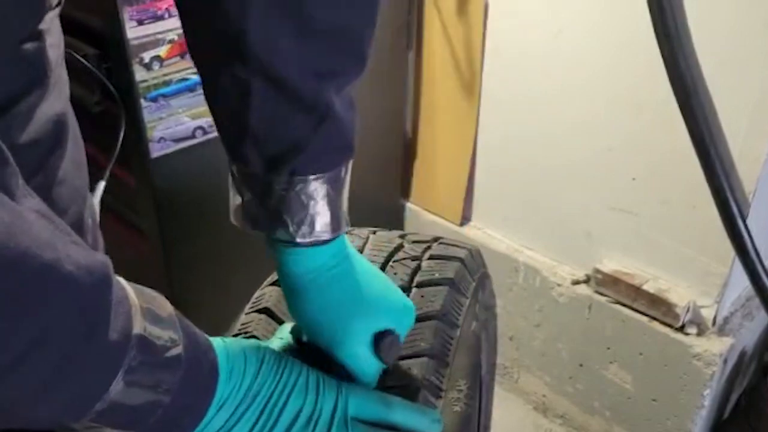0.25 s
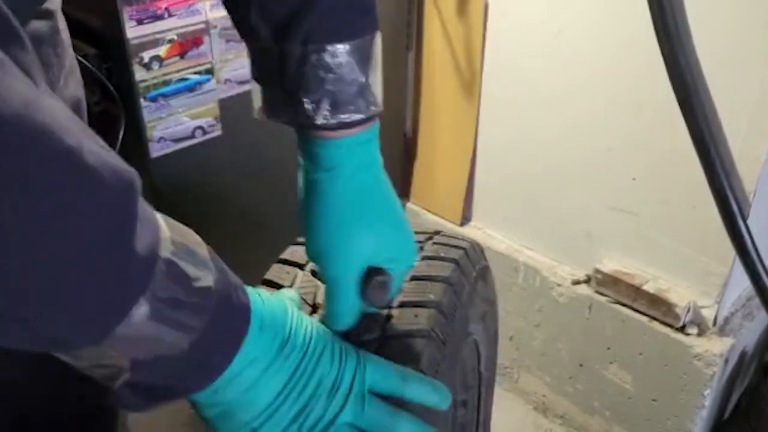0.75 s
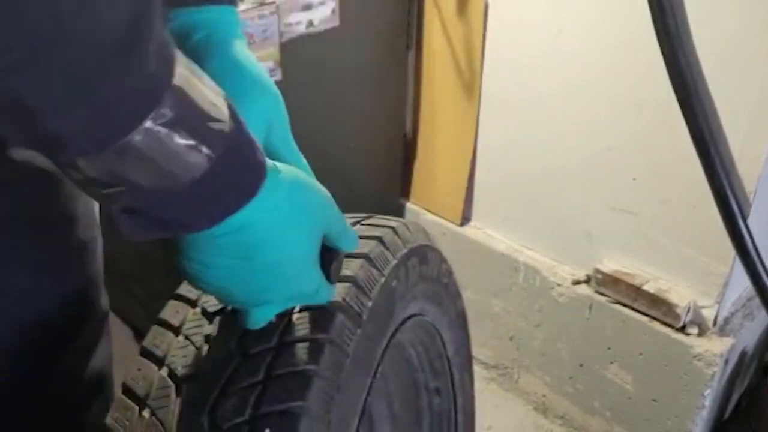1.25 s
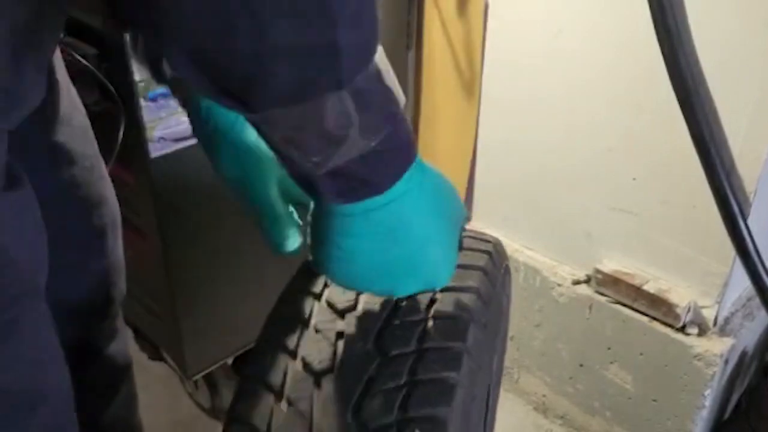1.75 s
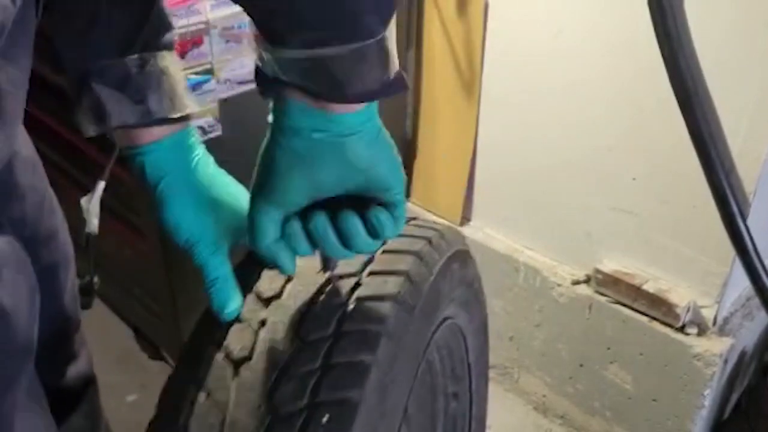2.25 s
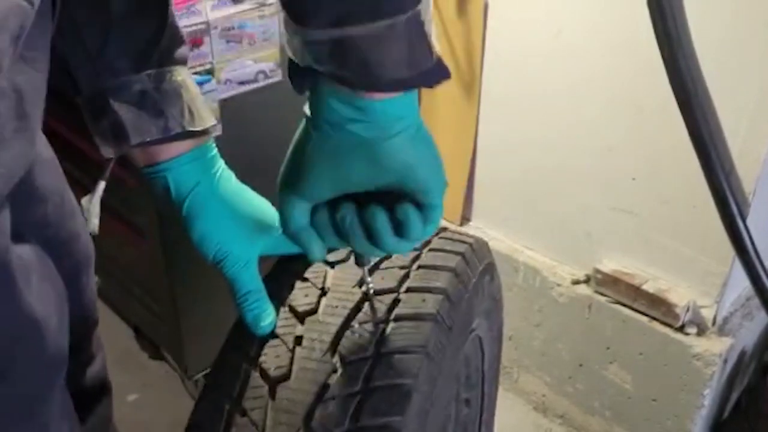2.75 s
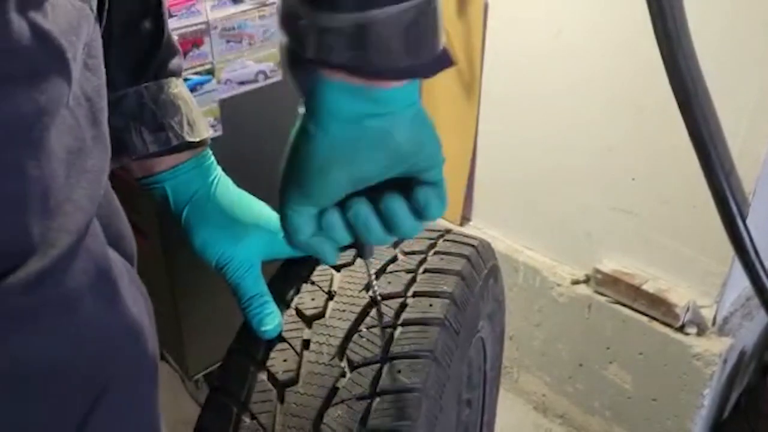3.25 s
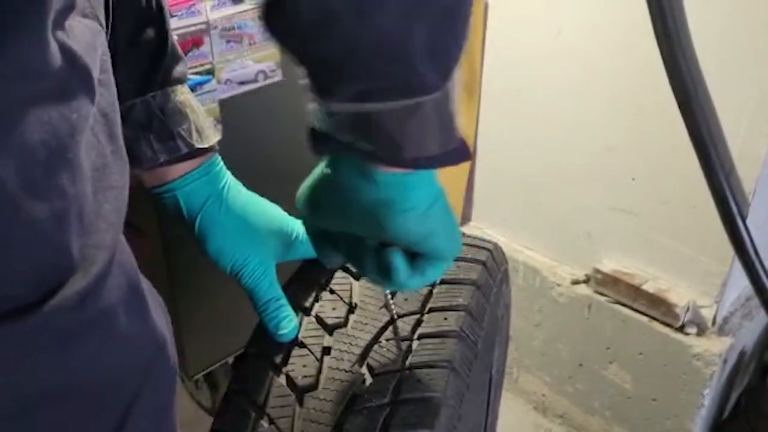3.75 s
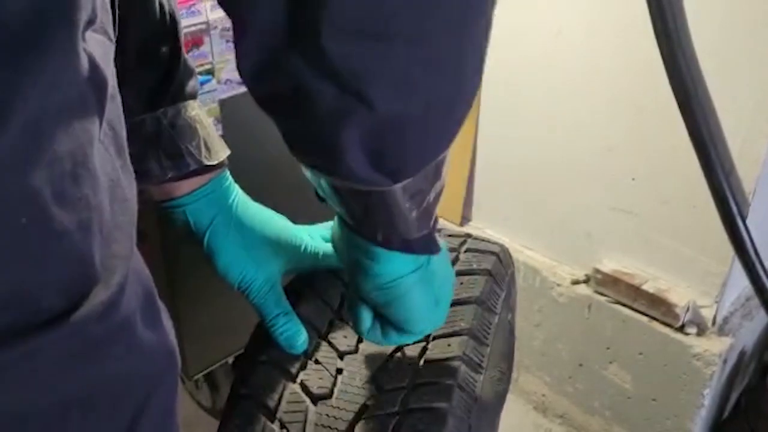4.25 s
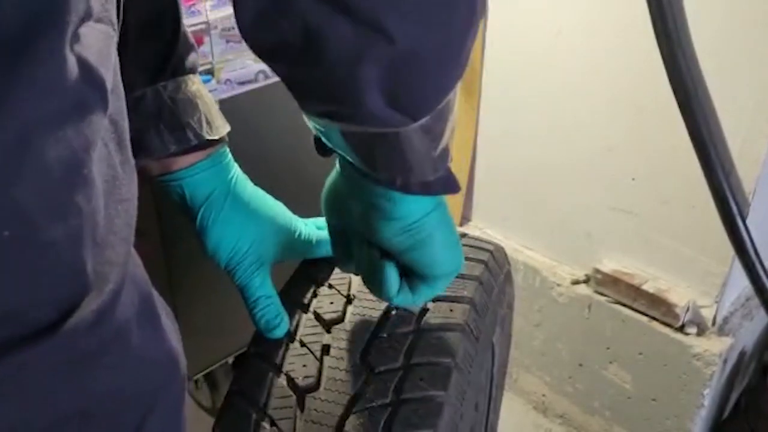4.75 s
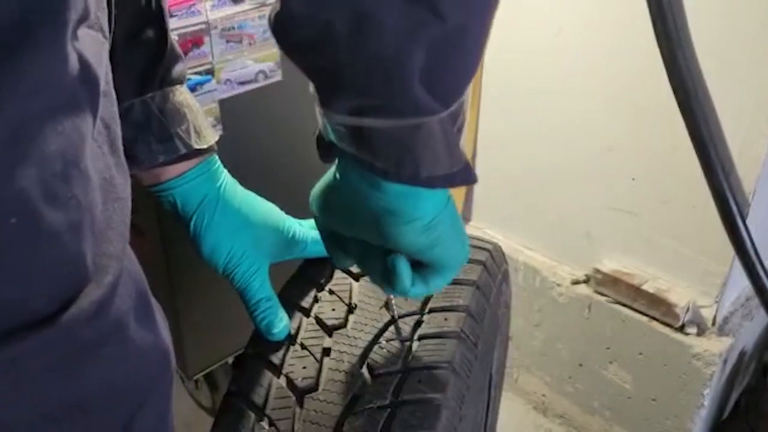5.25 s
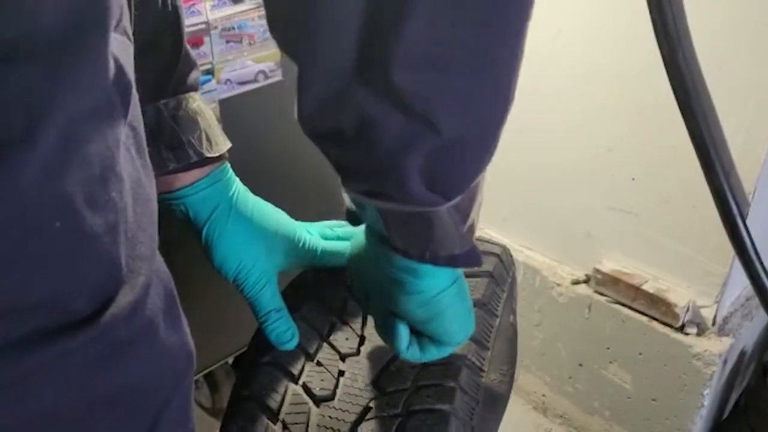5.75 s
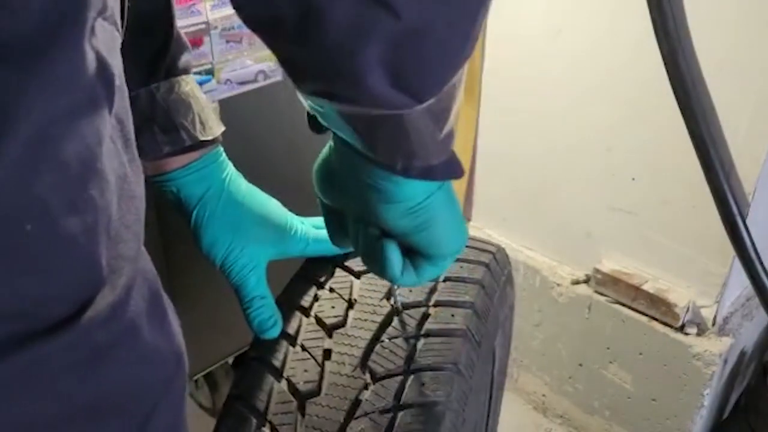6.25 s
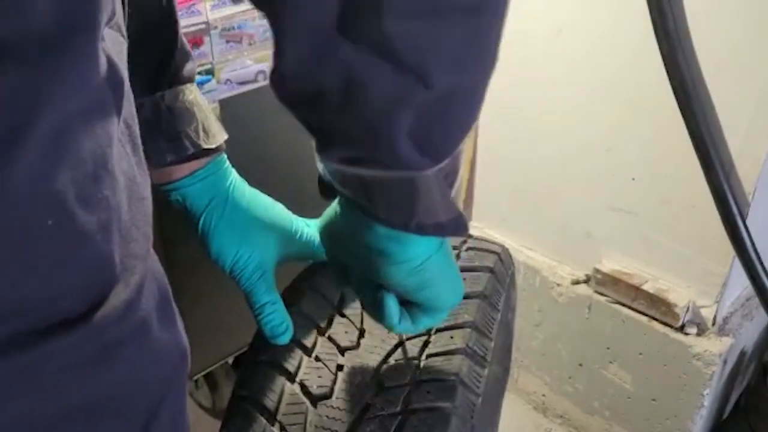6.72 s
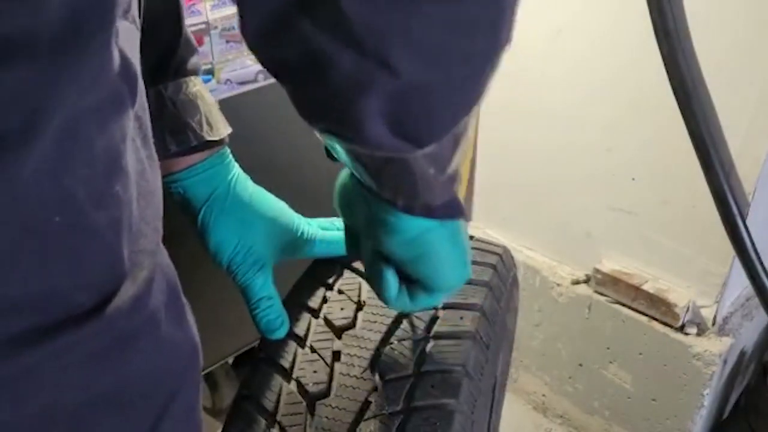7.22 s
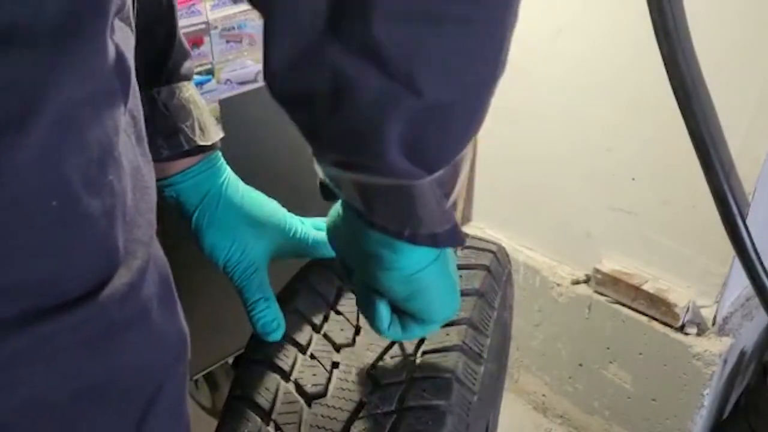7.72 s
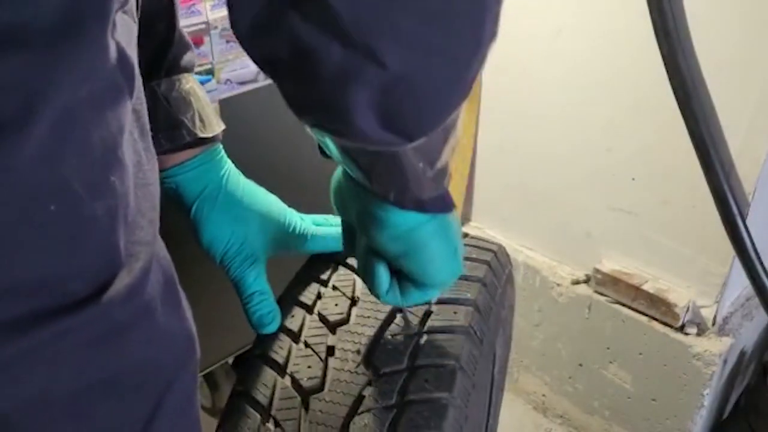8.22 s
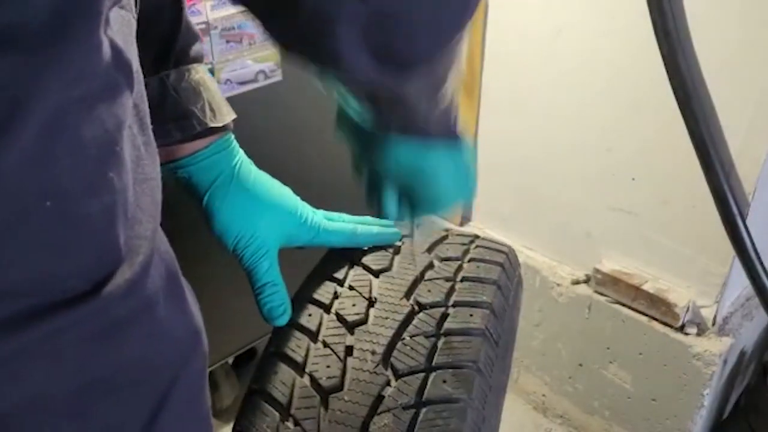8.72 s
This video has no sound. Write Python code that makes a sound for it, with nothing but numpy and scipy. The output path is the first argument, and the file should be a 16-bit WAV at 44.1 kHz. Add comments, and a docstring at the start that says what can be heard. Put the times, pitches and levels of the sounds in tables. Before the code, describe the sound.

A ridged steel tool is sawn through a punctured tire, heard very close. Sparse handling knocks and rubbing come first, then tentative scratches, then alternating strokes: clustered snaps with a hollow rubber boom, answered by brighter ratcheting rasps. Rubber squeezes and crackles underneath; short hisses of air escape near the end, over faint low room hum.

```python
"""A steel rasp is worked up and down in a punctured tire on a garage floor, close to two microphone ports.
Each ridge slips past the steel belt with a gritty snap (noise bursts through resonances) and jolts
the hollow carcass, which rings low (decaying sines). Coloured noise makes a bright hiss (cloth rustle early
on, later air past the shaft), the rub of gloves and shaft with its crackle, and the room tone; narrow
resonances of noise make the rocking carcass and a low hum. Scattered echoes make the garage."""
import sys
import numpy as np
from scipy import signal
from scipy.fft import rfft, irfft, next_fast_len
from scipy.io import wavfile
from scipy.ndimage import uniform_filter1d

SR = 44100
rng = np.random.default_rng(int(sys.argv[2]) if len(sys.argv) > 2 else 0)


def convert_level_to_amplitude(level_db):
    """Map a level in decibels to its linear amplitude factor."""
    exponent = np.asarray(level_db, float) / 20
    return 10 ** exponent


def waveform_to_disk(signal):
    """Save audio, clipped to [-1, 1], as 16-bit WAV at the path in sys.argv[1]."""
    frames = np.transpose(np.atleast_2d(signal))
    scaled = np.clip(frames, -1, 1) * 32767
    samples = np.round(scaled).astype(np.int16)
    wavfile.write(sys.argv[1], SR, samples)


N = 396018  # length in samples
SIZE = next_fast_len(N)
HZ = np.fft.rfftfreq(SIZE, 1 / SR)

# ridges slipping past the belt: start_s, snap_db, fizz_db (treble), jolt_db (before a common trim)
SLIP_EVENTS = [(0.0908, -31, -37, -26), (0.0986, -25.5, -31.5, -15.5), (0.1542, -36, -58, -21.5),
               (0.2393, -30, -61, -18), (0.6849, -46, -54, -41), (0.746, -54, -66, -56),
               (0.913, -45, -66, -51), (0.9516, -53, -46, -61), (1.7039, -61.5, -70, -15.5),
               (1.7777, -33, -38, -24), (2.448, -40, -37, -41), (2.463, -35.5, -29, -36),
               (2.4872, -33.5, -25, -40), (2.5031, -29.5, -30, -42), (2.511, -30.5, -25, -27),
               (2.559, -28, -19, -19.5), (2.8972, -43, -33, -79), (2.908, -55, -48, -56),
               (2.9253, -20, -21, -20.5), (2.9555, -40, -32, -35), (2.9658, -25.5, -20.5, -20),
               (3.027, -32, -19, -36), (3.42, -36, -36, -81), (3.436, -33, -24.5, -52),
               (3.696, -51, -42, -59), (3.815, -38.5, -32.5, -52), (3.8541, -44, -47, -55),
               (3.9122, -34, -40, -45), (3.9406, -43.5, -63, -42), (4.008, -43, -64.5, -29),
               (4.068, -26.5, -28.5, -30.5), (4.1648, -32.5, -35.5, -19), (4.1997, -40.5, -39, -24),
               (4.2481, -41, -48, -23), (4.2719, -43, -48, -20.5), (4.305, -48, -38.5, -47),
               (4.3828, -27, -31, -12.5), (4.4078, -26, -32, -11), (4.437, -22.5, -38, -12),
               (4.4467, -21.5, -22.5, 1.5), (4.6218, -29.5, -27, -32), (4.7645, -26.5, -28, -17),
               (4.8165, -40, -26.5, -45), (4.8293, -41, -35, -24), (4.8379, -22.5, -23, -34),
               (4.8706, -21, -20, -20), (4.9052, -18.5, -17, -22), (4.9435, -22.5, -17, -15.5),
               (5.0091, -20.5, -17.5, -46), (5.2013, -33, -30, -54), (5.3842, -39.5, -38, -59),
               (5.6709, -26, -28.5, -21), (5.684, -41, -42, -40), (5.6996, -22.5, -30, -8.5),
               (5.7191, -22, -24.5, -23), (5.7383, -24.5, -38, -15), (5.7504, -27, -27, -16.5),
               (5.8064, -25, -43, -12), (5.8163, -28.5, -33, -14), (5.8235, -37, -40, -9),
               (5.832, -18.5, -24.5, 1.5), (6.0392, -44, -39, -32), (6.0587, -37, -35, -50),
               (6.0749, -30.5, -29, -21), (6.087, -20, -33, -24), (6.123, -23.5, -17, -26),
               (6.1443, -25.5, -32, -21), (6.1533, -26, -20, -21), (6.179, -22, -21, -36),
               (6.208, -22, -21.5, -15), (6.2349, -25.5, -22, -17), (6.3036, -40, -34.5, -48),
               (6.3903, -31, -31.5, -35), (6.585, -51.5, -65, -51), (6.74, -28, -32, -19),
               (6.77, -39, -28.5, -30), (6.811, -31.5, -32.5, -13.5), (6.8322, -31, -35, -16),
               (6.85, -27, -33, -11), (6.8783, -24, -34, -11), (6.9088, -21, -25.5, -0.5),
               (7.1486, -37, -34, -28), (7.182, -22, -31, -18), (7.2066, -25.5, -30, -21.5),
               (7.22, -20, -16, -15), (7.2442, -21, -23, -16), (7.271, -21.5, -18, -25),
               (7.295, -21, -20, -18.5), (7.3249, -23, -21.5, -18), (7.3418, -29.5, -24.5, -36),
               (7.3664, -32, -22, -21), (7.3801, -25, -24, -29), (7.763, -28.5, -26, -12.5),
               (7.7827, -28, -37, -8), (7.7987, -27, -33, -23), (7.8193, -26.5, -29, -11),
               (7.8471, -25, -31, -18), (7.8654, -23, -27, 1.5), (8.1303, -37.5, -36, -32),
               (8.1443, -32, -28, -21), (8.161, -25.5, -31.5, -20), (8.1989, -31, -24, -18),
               (8.211, -21.5, -21, -17.5), (8.2561, -21.5, -22.5, -28), (8.291, -22.5, -18.5, -20.5),
               (8.3234, -23, -19.5, -20), (8.3458, -30, -25.5, -25), (8.3628, -23.5, -22, -23),
               (8.4066, -32.5, -26.5, -43), (8.4994, -43, -33.5, -45), (8.533, -27, -21.5, -21.5),
               (8.642, -43, -31.5, -33), (8.6586, -35.5, -33, -28.5), (8.674, -24, -20, -18.5),
               (8.7134, -18.5, -19.5, -39), (8.734, -17.5, -16, -20)]
# low ringing of the hollow tire: pitch_hz, level_db (relative), t60_s
CARCASS_MODES = [(64.7, 4, 0.13), (80, -12.5, 0.19), (97.8, -7.5, 0.21), (113, -22, 0.022),
                 (193.1, -8, 0.15), (260, -9.5, 0.1), (327, -15.5, 0.031)]
# resonances of the tread block: pitch_hz, width_hz, level_db (relative)
TREAD_MODES = [(349, 66, 8), (582, 59, 7), (707, 75, 6), (902, 114, 3.5), (1077, 91, 4.5), (1364, 390, -5)]
# resonances of the steel belt: pitch_hz, width_hz, level_db (relative)
BELT_MODES = [(2310, 1400, 1), (3820, 570, 8), (4110, 2630, -0.5)]
# treble resonances of the wire grit: pitch_hz, width_hz, level_db (relative)
FIZZ_MODES = [(7500, 350, 4), (9000, 4500, -0.5), (13600, 2400, 3.5)]


def evened(x):
    """Scales to rms 1."""
    return x / np.sqrt(np.mean(x ** 2) + 1e-20)


def read(points, hz):
    """Reads a table on a log-frequency axis."""
    f, value = np.transpose(points)
    return np.interp(np.log(hz + 1), np.log(f + 1), value)


def add(mix, start_s, sound):
    """Mixes a sound in at a time, cut off at the end of the mix."""
    part = mix[round(start_s * SR):][:len(sound)]
    part += sound[:len(part)]


def resonances(x, modes):
    """Parallel two-pole resonances of alternating sign."""
    total = 0
    for k, (hz, width_hz, db) in enumerate(modes):
        b, a = signal.iirpeak(hz, hz / width_hz, SR)
        total = total + (-1) ** k * convert_level_to_amplitude(db) * signal.lfilter(b, a, x)
    return total


def noise(spectrum, patchy_db):
    """Coloured noise of rms 1 whose level drifts in patches of time and frequency."""
    hz = np.fft.rfftfreq(1024, 1 / SR)
    real, imaginary, patches = rng.standard_normal((N // 256 + 5, 513, 3)).T
    patches = uniform_filter1d(patches, size=14, axis=0)
    patches = evened(uniform_filter1d(patches, size=8, axis=1))
    level_db = read(spectrum, hz)[:, None] + patchy_db * patches
    z = (real + 1j * imaginary) * convert_level_to_amplitude(level_db)
    return evened(signal.istft(z, nperseg=1024, noverlap=768)[1][:N])


def hum():
    """A low hum whose pitch and level waver: noise through one narrow resonance, twice."""
    mode = [(64.8, 7, 0)]  # pitch_hz, width_hz, level_db
    once = resonances(rng.standard_normal(N), mode)
    return convert_level_to_amplitude(-56.5) * evened(resonances(once, mode))


def room_tone():
    """Steady background of the room: coloured noise, mostly bass, drawn apart for two channels."""
    # spectrum of the quiet room: pitch_hz, level_db (per Hz, relative)
    tone_spectrum = [(21, -28), (35, 6), (74, 7), (162, -32), (392, -7), (467, -32), (716, -26.5),
                     (1820, -18.5), (2110, -12), (5100, -48), (9560, -31), (14300, -71)]
    return convert_level_to_amplitude(-59.5) * np.array([noise(tone_spectrum, 3.0), noise(tone_spectrum, 2.2)])


def garage(x):
    """Sparse taps of random sign, each band dying at its own speed; two tails take turns so like hits differ."""
    # decay of the garage: pitch_hz, t60_s
    decay_t60 = [(100, 0.83), (260, 0.075), (700, 0.57), (1800, 0.55), (5000, 0.46), (13000, 0.34)]
    # strength of the room tail: pitch_hz, level_db
    tail_level = [(60, -18.5), (300, -8), (1500, -6), (6000, -11.5), (14000, -6.5)]
    taps = np.zeros((4, 30000))
    at = np.arange(300, 29980, 20) + rng.integers(0, 20, (4, 1484))
    np.put_along_axis(taps, at, rng.choice([-1., 1.], at.shape), 1)
    hz, t, z = signal.stft(taps, SR, nperseg=256)
    z = z * convert_level_to_amplitude(-60 * t / read(decay_t60, hz)[:, None])
    # each band is scaled by its energy, averaged over the four tails
    energy = (abs(z) ** 2).mean(0).sum(1) * 128 ** 2 * 4 / 3
    z *= (convert_level_to_amplitude(read(tail_level, hz)) / np.sqrt(energy))[:, None]
    tails = signal.istft(z, SR, nperseg=256)[1].reshape(2, 2, -1)  # turn, channel, time
    turn = 2 * np.pi * 11 * np.arange(N) / SR  # 11 rounds a second
    sends = (x * [np.sin(turn), np.cos(turn)])[:, None]
    return signal.oaconvolve(sends, tails, axes=2).sum(0)[:, :N]


def drag(column, fade_db_s, rest_db):
    """Level of all drags of hand or shaft: soft rise, hold, then a steady fall in dB, over a resting level."""
    # glove or shaft dragging on rubber: start_s, length_s, rub_db (before the mix of rub and crackle),
    # rocking_db (of the carcass)
    drag_events = [(0.092, 0.35, -50.5, -65), (0.658, 0.042, -60, -55), (0.838, 0.27, -54.5, -70),
                   (1.222, 0.11, -41.5, -55), (1.687, 0.15, -48.5, -46), (2.198, 0.077, -51, -51),
                   (2.497, 0.09, -43.5, -45), (2.685, 0.033, -48.5, -44.5), (2.993, 0.052, -41, -55),
                   (3.173, 0.049, -53.5, -51), (3.957, 0.48, -62, -46), (4.327, 0.31, -48.5, -42),
                   (4.767, 0.22, -41, -35), (5.393, 0.064, -85, -54.5), (5.777, 0.14, -49, -34.5),
                   (6.078, 0.18, -39.5, -36), (6.697, 0.25, -51, -33), (7.15, 0.21, -37.5, -36),
                   (7.71, 0.23, -51.5, -31.5), (8.172, 0.16, -39, -36), (8.652, 0.086, -40.5, -35.5)]
    t, rows = np.arange(0, N + 64, 64) / SR, np.array(drag_events)
    since_start, length = t - rows[:, :1], rows[:, 1:2]
    rise = np.clip(since_start / (0.17 * length), 0, 1) ** 2  # over 0.17 of the length
    fall_db = fade_db_s * np.maximum(since_start - length, 0)
    level = rise * convert_level_to_amplitude(rows[:, column, None] - fall_db)
    total = np.sqrt((level ** 2).sum(0) + convert_level_to_amplitude(rest_db) ** 2)
    return np.interp(np.arange(N) / SR, t, total)


def rocking():
    """The carcass rocks under the drags: noise shakes its low resonances."""
    modes = [(hz, 1.07 / t60, db) for hz, db, t60 in CARCASS_MODES]
    shake = resonances(rng.standard_normal(N), modes)
    return drag(column=3, fade_db_s=106, rest_db=-67.5) * evened(shake)


def bright_hiss():
    """Cloth rustles early on, later air escapes past the shaft: both are bright noise that swells and sinks."""
    # colour of the hiss: pitch_hz, level_db (per Hz, relative)
    hiss_spectrum = [(300, -31), (1500, -17.5), (4000, -6), (7500, -7.5), (10500, -3.5), (12500, -7),
                     (14300, 2.5)]
    # bright hiss, cloth rustle early on, later air past the shaft: time_s, level_db
    hiss_level = [(0, -84), (0.75, -63), (0.95, -55.5), (1.3, -48), (1.6, -59), (2.1, -55.5), (2.45, -48.5),
                  (2.7, -89), (2.95, -39), (3.15, -64), (3.8, -55.5), (4.5, -76), (4.9, -56), (5.2, -97),
                  (6.05, -64), (6.3, -45), (6.5, -86), (7.3, -61), (7.5, -80), (8.1, -82), (8.27, -35),
                  (8.6, -62), (8.76, -33), (8.98, -36.5)]
    level = convert_level_to_amplitude(np.interp(np.arange(N) / SR, *np.transpose(hiss_level)))
    return level * np.array([noise(hiss_spectrum, 3.5), noise(hiss_spectrum, 3.5)])


def rubbing():
    """Glove and shaft drag on the tread: grainy rubber noise, and wire crackle ringing belt and tread."""
    # colour of the rubber: pitch_hz, level_db (per Hz, relative)
    rub_spectrum = [(150, -2), (350, 1.5), (800, 2), (2500, -8), (5000, -7.5), (9000, -11), (15000, -24)]
    grains = convert_level_to_amplitude(2.45 * evened(uniform_filter1d(rng.standard_normal(N), size=90)))
    rub = evened(np.array([noise(rub_spectrum, 4.2), noise(rub_spectrum, 2.4)]) * grains)
    crackles_per_s = 340
    tick_level = convert_level_to_amplitude(4.4 * np.minimum(rng.exponential(1, N), 4))
    ticks = (rng.random(N) < crackles_per_s / SR) * tick_level
    # each tick is a burst of noise dying within a few milliseconds
    ticks = np.convolve(ticks, np.exp(-np.arange(120) / 22.0))[:N] * rng.standard_normal((2, N))
    crackle = resonances(ticks, BELT_MODES)
    crackle = crackle + convert_level_to_amplitude(4.5) * resonances(ticks, TREAD_MODES)
    crackle = evened(crackle + convert_level_to_amplitude(-18.0) * resonances(ticks, FIZZ_MODES))
    # the steadying hand never quite rests
    level = drag(column=2, fade_db_s=114, rest_db=-62.5)
    return level * (convert_level_to_amplitude(-5.0) * rub + convert_level_to_amplitude(-13.0) * crackle)


def slip_rules():
    """Knock level (dB) and nominal length (ms) of each slip, from the grip of the moment."""
    # pushes knock the tread harder than pulls, light touches tick short:
    # start_s, knock_over_snap_db (below 1.5 kHz), slip_ms (nominal)
    grips = [(0, 0.5, 2.8), (0.6, -5, 8.7), (0.72, -0.5, 3.7), (1.65, 36.5, 2.9), (1.75, -2, 10.4),
             (2.4, -1.5, 4.3), (2.85, -5.5, 3.3), (3.3, -10, 3.2), (4.1, 2, 2.4), (4.35, 0.7, 6.2),
             (4.6, -3, 6.3), (5.1, -8, 1.3), (5.6, -0.8, 3.92), (6.0, -3, 7.2), (6.5, 4, 4.9),
             (7.1, -2.5, 4.35), (7.7, 8, 5.77), (8.1, -2.5, 4.7), (8.6, -3.5, 5.7)]
    s, snap_db = np.transpose(SLIP_EVENTS)[:2]
    start, knock_db, ms = np.transpose(grips)
    grip = np.maximum(np.searchsorted(start, s) - 1, 0)
    return snap_db + knock_db[grip], ms[grip]


def jolts():
    """The ridge catches at the end of its slip and dents the tread; the carcass springs back and rings low."""
    # low thumps of the tire without a snap, from bumps or dull slips: start_s, peak_db
    dull_thumps = [(1.645, -39), (1.715, -31.5), (2.25, -24.5), (2.688, -34.5), (5.424, -49),
                   (5.443, -39.5), (5.469, -36.5)]
    t, out = np.arange(SR // 4) / SR, np.zeros(N)
    ring = sum(convert_level_to_amplitude(db - 60 * t / t60) * np.sin(2 * np.pi * hz * t) for hz, db, t60 in CARCASS_MODES)
    push, dent = np.hanning(round(0.003 * SR)), np.hanning(round(0.0033 * SR))
    thump = np.convolve(push, ring)
    thump /= abs(thump).max()
    for s, db in dull_thumps:
        add(out, s, convert_level_to_amplitude(db) * thump)
    # under the tool the dent pushes against the first swing
    thump[:len(dent)] -= 0.75 * dent
    for (s, *_, db), ms in zip(SLIP_EVENTS, slip_rules()[1]):
        add(out, s + 0.652 * ms / 1000, convert_level_to_amplitude(db - 5.5) * thump)
    return out


def slips():
    """Each slip is a few milliseconds of clumped wire grit ringing belt, tool and tread block; two sides of the tool."""
    s, snap_db, fizz_db, _ = np.transpose(SLIP_EVENTS)
    knock_db, ms = slip_rules()
    count = len(s)
    ms = ms * convert_level_to_amplitude(1.5 * rng.standard_normal(count))  # chance spread of slip length, in dB
    draws = rng.standard_normal((count, 4, 1800))
    clumps_db = 6.6 * evened(uniform_filter1d(draws[:, 2:3], size=36)) + 2.0 * draws[:, 3:] ** 2
    t = np.arange(-600, 1200) / SR  # the wire lets go at 0
    u = np.maximum(t, 0) / (np.maximum(ms, .5)[:, None, None] / 1000)  # time in slip lengths
    # the wire frays and whispers before it lets go
    creep = convert_level_to_amplitude(-19.5) * np.exp(np.minimum(t, 0) * 3 / 0.029) * (t > -.0135)
    # after a rest of 0.06 s the tool breaks loose at once: no creep, a quicker rise
    moving = (np.diff(s, prepend=0) < 0.06)[:, None, None]
    rise = np.minimum(u / np.where(moving, 0.35, 0.12), 1)
    burst = draws[:, :2] * convert_level_to_amplitude(clumps_db) * np.maximum(rise, creep * moving) * np.exp(-u ** 1.4)
    # level_db, resonances, reach of the grit in hz
    layers = ((snap_db, BELT_MODES, (1100, 6500)),
              (fizz_db, FIZZ_MODES, (5500, 17000)),
              (knock_db, TREAD_MODES, (250, 1900)))
    sound = 0
    for db, modes, reach in layers:
        drive = signal.lfilter(*signal.butter(2, reach, "band", fs=SR), burst)
        # each ridge favours other modes
        colour = convert_level_to_amplitude(3.16 * rng.standard_normal((count, len(modes), 1, 1)))
        ring = 0
        for k, mode in enumerate(modes):
            ring = ring + (-1) ** k * colour[:, k] * resonances(drive, [mode])
        peak = np.sqrt(2 * uniform_filter1d(ring ** 2, size=60).max(axis=2, keepdims=True))
        sound = sound + convert_level_to_amplitude(db)[:, None, None] * ring / peak
    out = np.zeros((N + 600, 2))  # 600 samples ahead hold the creep
    for start, pair in zip(s, sound):
        add(out, start - .0008, pair.T)
    return out[600:].T


def ports(pair, likeness, lag_ms):
    """Close ports hear bass alike and treble apart; the right one hears the shared part late."""
    left, other = rfft(pair, SIZE)
    same = np.clip(read(likeness, HZ), 0, 1)
    late = np.exp(-2j * np.pi * HZ * lag_ms / 1000)
    right = same * left * late + np.sqrt(1 - same ** 2) * other
    return irfft(np.array([left, right]), SIZE)[:, :N]


def band_edge(x, hz_per_db):
    """Treble falls away above 14.3 kHz, by 70 dB at most."""
    fall_db = np.clip((HZ - 14300) / hz_per_db, 0, 70)
    return irfft(rfft(x, SIZE) * convert_level_to_amplitude(-fall_db), SIZE)[:, :N]


def scene():
    """Direct sound, its room tail, room tone and hum; steady treble ends sharply, snaps spill a little higher."""
    # direct sound at the two ports: pitch_hz, likeness (left to right, 0 to 1)
    near_likeness = [(300, 0.99), (1000, 0.71), (3000, 0.58), (7000, 0.096), (13000, 0.42)]
    # diffuse sound at the two ports: pitch_hz, likeness (left to right, 0 to 1)
    diffuse_likeness = [(100, 0.91), (300, 0.67), (700, 0.2), (1400, 0.022), (3000, 0.018), (13000, .02)]
    snaps = slips()
    steady = jolts() + rubbing() + bright_hiss() + rocking()
    close = band_edge(snaps, 30.0) + band_edge(steady, 4.0)
    direct = ports(close, near_likeness, lag_ms=0.054)  # the left port is nearer the tire
    around = garage((snaps + steady)[0]) + room_tone()
    diffuse = ports(band_edge(around, 3.0), diffuse_likeness, lag_ms=0)
    return direct + diffuse + hum()


def band_limit(x):
    """A steep low-pass at the top of the band."""
    return signal.sosfilt(signal.butter(12, 15450, fs=SR, output="sos"), x)


def record(dry):
    """Each microphone port has its own colour; both roll off the bass below 42 Hz."""
    # colour of the ports: pitch_hz, left_minus_right_db
    port_lean = [(60, 1), (300, 2), (1000, 2), (2500, 3), (5000, 1), (9000, 2), (13000, 1.5)]
    lean = convert_level_to_amplitude(np.outer([.5, -.5], read(port_lean, HZ)))
    miked = irfft(rfft(dry, SIZE) * lean, SIZE)[:, :N]
    miked = signal.lfilter(*signal.butter(2, 42.0, "high", fs=SR), miked)
    return band_limit(miked)


dry = scene()
out = record(dry)
waveform_to_disk(out)
```